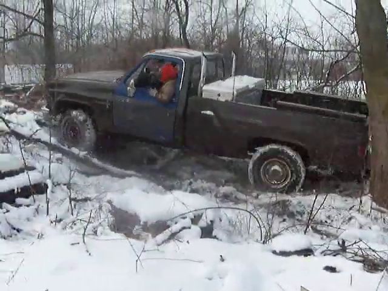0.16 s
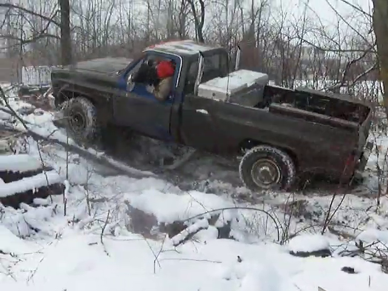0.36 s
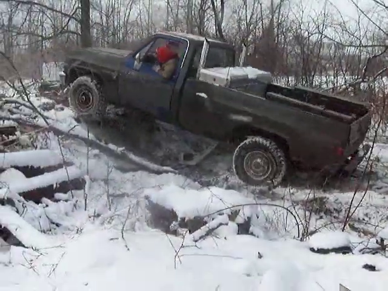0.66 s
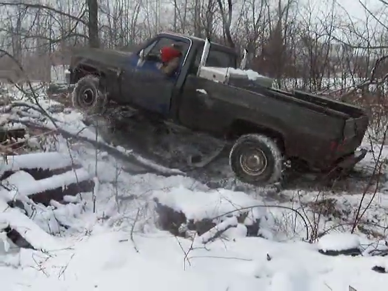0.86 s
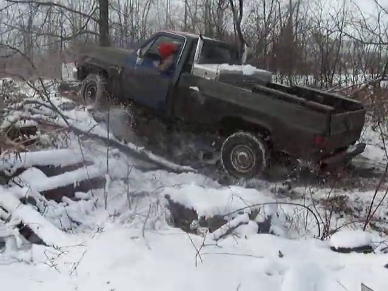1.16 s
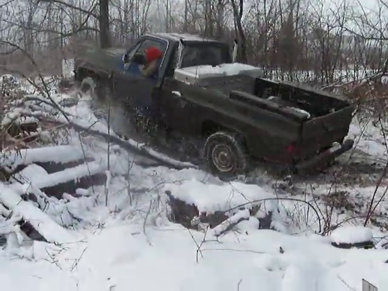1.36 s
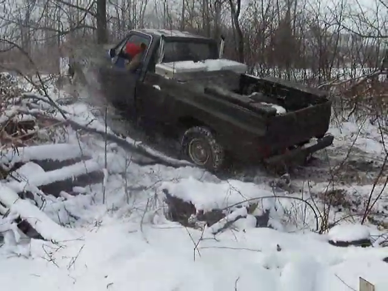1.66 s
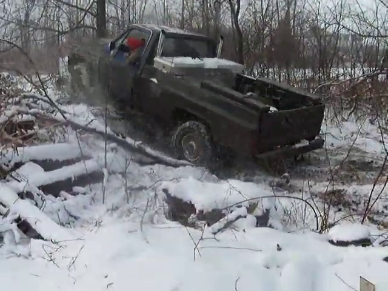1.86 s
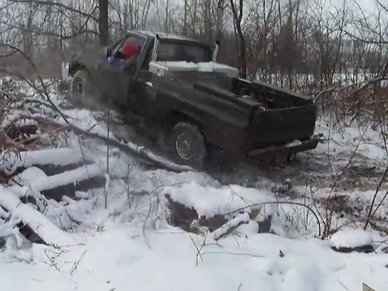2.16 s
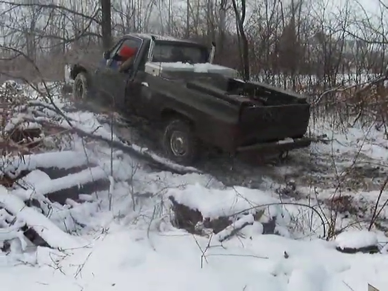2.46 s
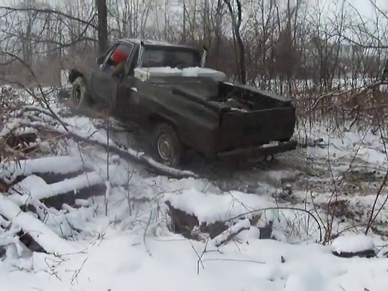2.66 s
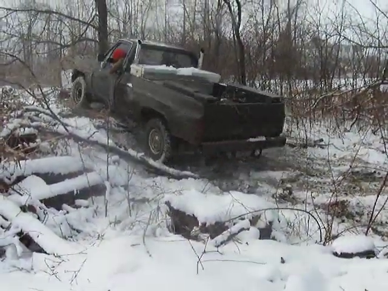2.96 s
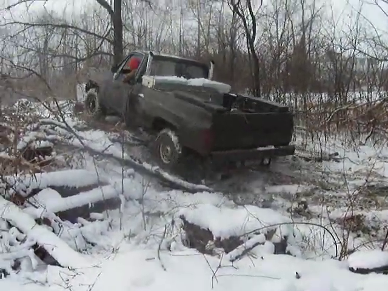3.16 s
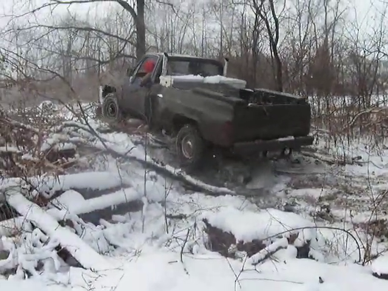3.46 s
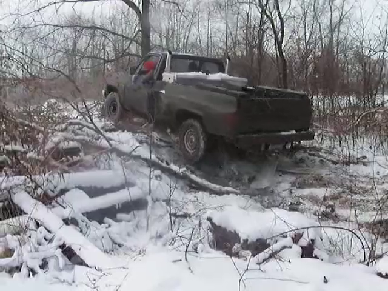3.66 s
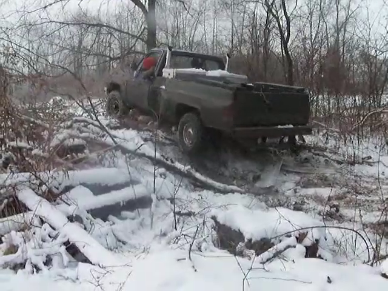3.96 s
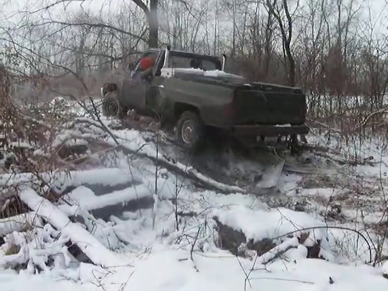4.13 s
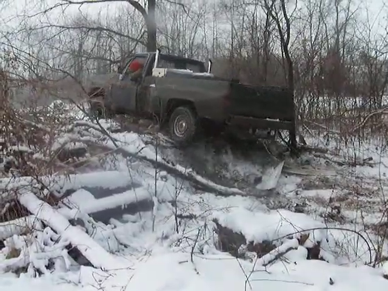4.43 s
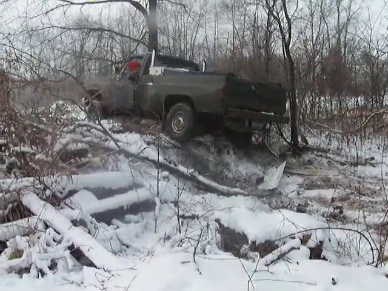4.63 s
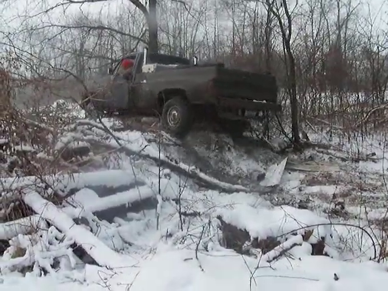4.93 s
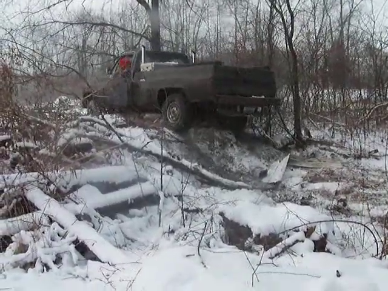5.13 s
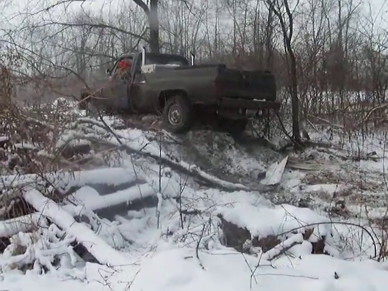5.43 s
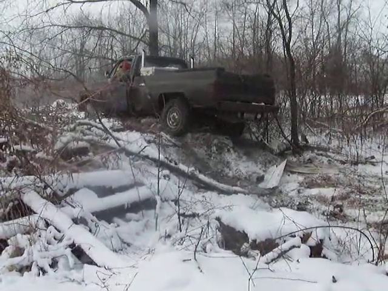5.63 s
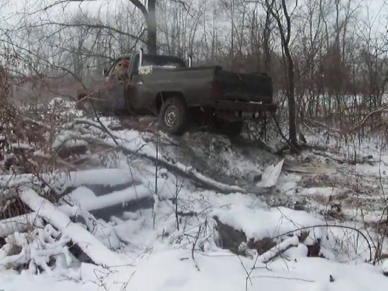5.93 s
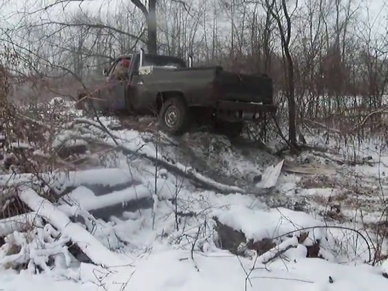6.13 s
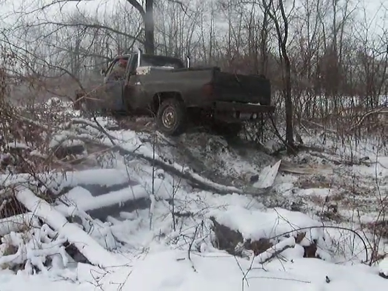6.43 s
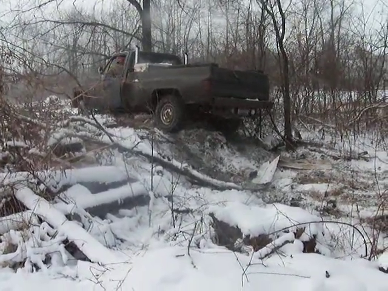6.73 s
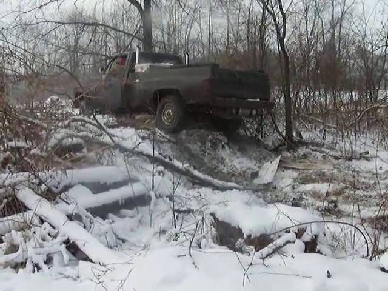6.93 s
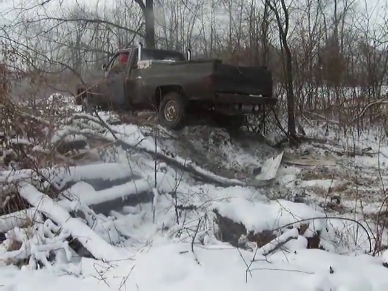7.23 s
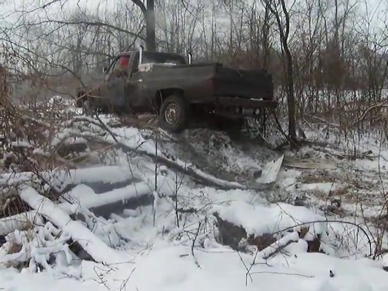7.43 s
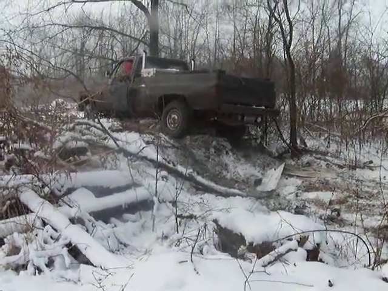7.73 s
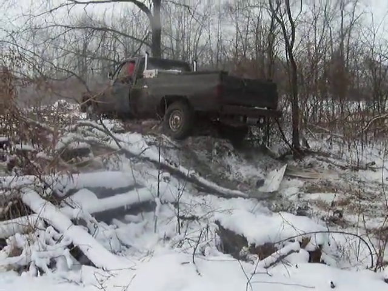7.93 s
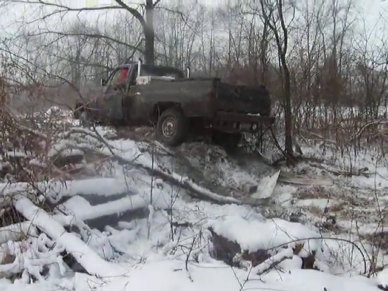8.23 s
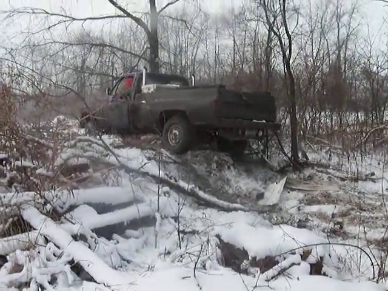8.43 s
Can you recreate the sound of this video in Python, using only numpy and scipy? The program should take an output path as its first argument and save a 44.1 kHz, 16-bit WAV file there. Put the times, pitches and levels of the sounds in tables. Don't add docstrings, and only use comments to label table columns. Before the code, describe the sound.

Outdoors in snowy woods, an old pickup's eight-cylinder engine roars at high revs some metres away, exhaust raspy, hissing and spitting, sagging as the tyres bite. The body crashes on the bank, the throttle drops, blips once and falls to a lumpy idle. After a quick stab of gas and a dry twig snap, it revs up hard again. Wind buffets and thumps the small stereo microphone.

```python
import sys
import numpy as np
from scipy import signal
from scipy.fft import rfft, irfft, next_fast_len
from scipy.io import wavfile
from scipy.ndimage import map_coordinates

SR = 44100
rng = np.random.default_rng(int(sys.argv[2]) if len(sys.argv) > 2 else 0)


def generate_wav(signal):
    frames = np.transpose(np.atleast_2d(signal))
    scaled = np.clip(frames, -1, 1) * 32767
    pcm = np.round(scaled).astype(np.int16)
    wavfile.write(sys.argv[1], SR, pcm)


def natural_amplitude(level_db):
    exponent = np.asarray(level_db, float) / 20
    return 10 ** exponent


N = 378819

# time in seconds, engine cycles in Hz.
ENGINE_SPEED = [(0.0, 24.37), (0.35, 25.0), (0.61, 26.93), (1.03, 28.43), (2.47, 29.61), (3.86, 28.34),
                (4.3, 27.15), (4.72, 19.22), (5.01, 20.41), (5.36, 25.82), (5.75, 19.86), (6.43, 16.74),
                (7.1, 15.05), (7.44, 17.05), (7.7, 15.87), (8.01, 19.77), (8.2, 21.24), (8.59, 27.98)]
# time in seconds, drop in Hz, half width in seconds.
SPEED_DIPS = [
    (1.57, 1.95, 0.33),
    (3.29, 1.37, 0.33),
    (2.5, 0.7, 0.14),
    (7.8, 0.6, 0.1),
]
# time in seconds, blast level in
# dB.
THROTTLE = [(0, -24), (1.4, -22), (2.9, -25.5), (4.22, -26), (4.45, -32.5), (4.65, -24.5), (4.9, -33),
            (5.31, -26), (5.86, -40.5), (7.11, -42), (7.35, -27.5), (7.735, -40), (7.79, -27.5),
            (7.94, -27), (8.02, -35.5), (8.35, -21), (8.52, -24), (8.59, -30)]
# time in seconds, pipe at full throttle in dB, boom in dB,
# far bank in dB, far bank delay in ms.
TAIL_ASPECT = [(.17, -9.5, -17.5, -3, 1.2), (.5, -10.5, -25.5, -5, .6), (1.0, -10, -19.5, -4, 0.44),
               (1.5, -11.5, -14.5, -3, 1.72), (1.9, -10.5, -19.5, -5.5, 0.84), (2.3, -10, -17, 2, 1.14),
               (3.0, -13, -16.5, 1.5, 0.91), (3.7, -15, -13.5, 4, 0.74), (4.2, -15, -19.5, 0.5, 0.64),
               (4.9, -23.5, -4.5, 9, 0.92), (5.2, -15, -14.5, 1.5, 0.93), (5.55, -11.5, -6.5, -3, 1.1),
               (6.5, -14.5, -9, -1.5, .3), (7.2, -15.5, -7.5, 4.5, 0.64), (7.5, -12, -10.5, 0, 0.11),
               (8.05, -16.5, -4.5, 7.5, 1.1), (8.3, -14, -10, 3.5, 0.89), (8.45, -13.5, -13.5, -0.5, .7)]
# place in eighths of the cycle, header delay in ms and
# size in dB when racing, delay in ms and size in dB when loping.
NEAR_BANK = [(0, .1, 5.4, -.5, 4.4), (2, -1.1, .2, -4.8, -12.5), (3, -1.6, -2.1, -.8, 1.6),
             (5, .1, -4.7, -.3, -3.9)]
FAR_BANK = [(1, 2.5, -10, 3.4, -4.9), (4, 1.2, -1.8, 1.6, -2.9), (6, -.9, 3.5, -.3, 0),
            (7, -1.9, -18.9, 0, -10.3)]
# Misfires, in seconds.
MISFIRES = [
    4.9,
    6.4,
]
# centre in Hz, width in Hz, level in dB.
BARK_MODES = [(286.3, 198.5, -9.5), (322.1, 164.5, 3.8), (327.5, 157.4, 1.9)]
BOOM_MODES = [(33.3, 26, -.3), (62.8, 26, .6), (133.7, 22.6, -10.8)]
UPPER_MODES = [(376.6, 82, -7), (135.9, 22.6, 6.6), (632, 360, -20)]
RASP_MODES = [(505, 169, 7.5), (625, 260, 7), (798, 87, 9), (1027, 150, -3.5)]
# frequency in Hz, level in dB per Hz.
HISS_COLOUR = [(590, -4), (1000, -8.5), (1180, -12), (1800, -10), (2080, -14.5), (2310, -10.5), (2510, -11),
               (4440, -11.5), (4900, -9.5), (5700, -0.5), (6240, -9), (6880, -7.5), (8450, -38),
               (11000, -54), (18600, -120)]
# time in seconds, peak in dB.
COUGHS = [(2.62, -20), (2.75, -19), (2.88, -17), (7.758, -21.5), (7.778, -19.5), (7.82, -14.5),
          (7.878, -11), (7.935, -13.5), (7.988, -16)]
# time in seconds, peak in dB.
SPITS = [(1.306, -9.5), (1.3943, -2), (1.5238, -5.5), (1.609, -10), (1.8618, -11.5), (2.071, -12),
         (2.164, -10), (2.375, -11.5), (1.933, -10), (2.458, -9), (2.515, -14), (2.598, -12), (2.621, -16),
         (2.656, -17), (2.724, -12.5), (3.325, -16.5), (3.68, -8), (4.055, -13), (3.756, -10),
         (4.1852, -14), (4.317, -10.5), (4.906, -17.5), (5.1269, -13.5), (5.257, -15), (5.383, -18),
         (5.617, -18.5), (6.2667, -28), (7.205, -16.5), (7.226, -17.5), (7.2672, -13.5), (7.33, -11.5),
         (7.819, -6), (7.84, -15), (7.8774, -6.5), (7.899, -16.5), (7.934, -11), (7.9858, -13.5),
         (8.179, -14), (8.3612, -8), (8.4846, -6.5)]
# time in seconds, peak in dB, t60 in seconds, dullness in dB.
BODY_BANGS = [(4.2722, -20.5, 0.093, 7), (4.402, -13.5, 0.24, -5.5), (4.4608, -13, 0.2, 8),
              (4.469, -10.5, 0.079, -0.5), (4.4803, -13.5, 0.3, 6), (4.499, -17.5, 0.13, -5.5),
              (4.4967, 1.5, 0.062, -11.5), (4.591, -23.5, 0.32, -5), (4.6313, -26, 0.2, 14),
              (4.6508, -24.5, 0.13, 4.5), (4.68, -17.5, 0.27, 0)]
# centre in Hz, width in Hz, level in dB.
PANEL_MODES = [(410, 120, 0), (544, 66, 6.5), (970, 220, -1.5), (1564, 220, -4), (1930, 170, -3.5),
               (2140, 220, -7), (2680, 200, -1), (3250, 210, -5), (3970, 110, -4.5), (5500, 270, -1.5)]
# time in seconds, peak in dB, t60 in seconds.
TWIGS = [
    (7.6008, -22.5, .012),
    (7.6252, -8.5, 0.0089),
]
# frequency in Hz, level in dB per Hz.
SNAP_COLOUR = [(1500, -27), (4500, -14.5), (5700, 3), (7000, -15), (9000, -22), (11500, -10), (15500, -20),
               (19000, -60)]
# time in seconds, peak in dB, half width in seconds.
GUSTS = [(.4, -22, 0.1), (1.8, -23, 0.33), (2.2, -26.5, 0.13), (2.578, -32.5, 0.065), (3.15, -29.5, 0.049),
         (3.38, -30, 0.19), (3.75, -27.5, 0.47), (4.3, -22.5, 0.33), (4.58, -20, 0.042), (4.83, -18, 0.16),
         (5.15, -14.5, 0.18), (5.619, -25.5, 0.15), (5.9, -18.5, 0.13), (6.25, -27, 0.067),
         (6.55, -23.5, 0.066), (6.88, -27.5, 0.043), (7.35, -19, 0.14), (7.65, -13.5, 0.14),
         (8.001, -22.5, 0.057), (8.301, -19.5, 0.099)]
# time in seconds, peak in dB.
THUMPS = [(3.289, -5.5), (3.936, 3.5), (4.848, 1), (4.949, 2), (5.811, -9.5), (5.921, -4), (5.935, -9),
          (5.987, -11), (6.156, -11), (6.205, -6.5), (6.247, -10), (6.431, -15.5), (6.551, -19.5)]
# frequency in Hz, level in dB per Hz.
BUFFET_COLOUR = [(12, -11), (25, 1), (40, -8.5), (60, -2), (130, -14.5), (250, -31.5), (500, -78)]
FLAP_COLOUR = [(80, -8), (150, 6), (300, 2.5), (700, -20.5), (1500, -36.5), (4000, -57.5)]
# time in seconds, left over right in dB.
WINDWARD = [(0, 0.5), (2.8, 5.5), (3.2, 14), (4.3, 8), (4.5, 6.5), (5.4, 3.5), (5.8, 7), (6.2, 12.5),
            (6.8, 2.5), (7.2, -12), (8.59, 2)]
# frequency in Hz, left-right likeness from 0 to 1.
LIKENESS = [(60, 0.71), (110, 0.84), (200, 0.71), (380, 0.93), (690, 1), (1280, 1), (2350, 0.94), (4340, 1),
            (8000, 0.52)]
# frequency in Hz, left over right in dB.
TRUCK_LEAN = [(60, 2), (98, 2.5), (160, 1), (260, 1), (420, -1.5), (690, 2), (1130, 5.5), (1840, 6),
              (3010, 0.5), (4900, 11), (8000, -6)]
# frequency in Hz, lead of the left port in radians.
TRUCK_LEAD = [(0, -1.6), (1120, 0.59), (1720, 0.6), (2410, -0.53), (2930, -0.88), (3700, 0.69),
              (4480, 0.87), (4740, 0.63), (5340, -1.5), (6120, -1.28), (6720, -0.47), (7060, -2), (7840, 1),
              (8180, 0.0)]

RACING_HZ, LOPING_HZ = 27, 16
FULL_DB = -23
PIPE_GROWS, RASP_GROWS = 0.65, 1.09
RASP_DB, UPPER_DB = -29, -29
MISS_DB, MISS_S = -11.5, 0.02
SPIT_T60_S, SPIT_DB, SPIT_LENGTHENS = 0.039, -9, 0.48
COUGH_T60_S, THUMP_T60_S = 0.075, 0.04
CALM_DB, FLAP_DB, FLAP_GROWS = -33, -5, 0.58


def engine():
    speed = curves(ENGINE_SPEED)[0] - sum(drop * bump(s, width) for s, drop, width in SPEED_DIPS)
    hiss_db, = curves(THROTTLE)
    pipe_db, boom_db, far_db, far_ms = curves(TAIL_ASPECT)
    below_full_db = hiss_db - FULL_DB
    pipe_db = pipe_db + PIPE_GROWS * below_full_db
    pipe_db = pipe_db + MISS_DB * sum(bump(s, MISS_S) for s in MISFIRES)
    rasp_db = RASP_DB + RASP_GROWS * below_full_db

    cycles = np.cumsum(speed) / SR - .15
    lope = np.clip((RACING_HZ - speed) / (RACING_HZ - LOPING_HZ), 0, 1)
    near = firings(cycles, lope, NEAR_BANK, scatter_db=.5, jitter_ms=.04)
    far = firings(cycles - speed * far_ms / 1000, lope, FAR_BANK, scatter_db=.5, jitter_ms=.04)
    pulses = (near + natural_amplitude(far_db) * far) * SR / (2 * speed)

    rounded = filtered(pulses, lambda hz: 1 / (1 + (hz / 450) ** 6))
    bark = filtered(rounded, pipe(BARK_MODES))
    boom = filtered(rounded, pipe(BOOM_MODES))
    upper = filtered(rounded, pipe(UPPER_MODES))
    tone = natural_amplitude(pipe_db + 8.5) * (natural_amplitude(boom_db) * boom - bark + natural_amplitude(UPPER_DB) * upper)

    puffs = unit(filtered(pulses * natural_amplitude(2.3 * wobble(40)), lambda hz: 1 / (1 + 1j * hz / 60) ** 2))
    rough = unit((0.68 + puffs) * rng.standard_normal(N))
    lines = 2.2 * unit(pulses) * np.clip(speed / 28, 0, 1) ** 2
    rasp = unit(filtered(lines + rough, pipe(RASP_MODES)))
    rasp = filtered(rasp, lambda hz: 1 / (1 + (hz / 1300) ** 6))

    gate = (0.93 + puffs) * natural_amplitude(0.67 * wobble(15))
    hiss = filtered(gate * rng.standard_normal((2, N)), lambda hz: natural_amplitude(along(HISS_COLOUR, hz)))
    hiss = spread(unit(hiss))
    return tone + natural_amplitude(rasp_db + 1.0) * rasp + natural_amplitude(hiss_db + 2.0) * hiss


def firings(cycles, lope, bank, scatter_db, jitter_ms):
    train = np.zeros(N)
    turn = np.arange(-1, int(cycles[-1]) + 1)
    for eighth, fast_ms, fast_db, slow_ms, slow_db in bank:
        chance = rng.standard_normal((300, 2))[:len(turn)]
        at = np.interp(turn + eighth / 8, cycles, np.arange(N), -N, 2 * N)
        slow = np.interp(at, np.arange(N), lope)
        delay_ms = fast_ms + slow * (slow_ms - fast_ms)
        size_db = fast_db + slow * (slow_db - fast_db)
        at = np.round(at + (delay_ms + jitter_ms * chance[:, 0]) * SR / 1000).astype(int)
        inside = (at >= 0) & (at < N)
        train[at[inside]] += natural_amplitude(size_db + scatter_db * chance[:, 1])[inside]
    return train


def coughs():
    rows = [(s, db, COUGH_T60_S) for s, db in COUGHS]
    return natural_amplitude(7.5) * filtered(bursts(rows, 0.003)[0], pipe(RASP_MODES[2:]))


def spits():
    rows = [(s, db, SPIT_T60_S * natural_amplitude(SPIT_LENGTHENS * (SPIT_DB - db))) for s, db in SPITS]
    bright = lambda hz: natural_amplitude(along(HISS_COLOUR, hz)) * (hz / 5500) ** 0.65
    return natural_amplitude(10.5) * spread(filtered(bursts(rows, 0.00095), bright))


def bangs():
    bright = bursts([row[:3] for row in BODY_BANGS], 0.00066)[0]
    dull = bursts([(s, db + dull_db, t60) for s, db, t60, dull_db in BODY_BANGS], 0.0042)[0]
    crash = filtered(bright, pipe(PANEL_MODES[3:])) + filtered(dull, pipe(PANEL_MODES[:3]))
    return natural_amplitude(8.5) * filtered(crash, lambda hz: 1 / (1 + (hz / 7500) ** 16))


def twigs():
    return natural_amplitude(17) * spread(filtered(bursts(TWIGS, 0.00046), lambda hz: natural_amplitude(along(SNAP_COLOUR, hz))))


def wind():
    strength = natural_amplitude(CALM_DB) + sum(natural_amplitude(db) * bump(s, width) for s, db, width in GUSTS)
    windward_db, = curves(WINDWARD)
    flap_colour = lambda hz: natural_amplitude(along(FLAP_COLOUR, hz))
    buffet = unit(filtered(lumps(4.7, 18), lambda hz: natural_amplitude(along(BUFFET_COLOUR, hz))))
    flap = unit(filtered(lumps(3.8, 55), flap_colour))
    flap_strength = natural_amplitude(CALM_DB + FLAP_DB) * (strength / natural_amplitude(CALM_DB)) ** FLAP_GROWS
    gusts = strength * buffet + flap_strength * flap
    gusts = gusts + 0.36 * gusts[::-1]
    thumps = bursts([(s, db, THUMP_T60_S) for s, db in THUMPS], 0.0025)
    thumps = natural_amplitude(12.0) * filtered(thumps, flap_colour)
    return (gusts + thumps) * natural_amplitude([windward_db, 0 * windward_db])


def lumps(depth_db, rate):
    swell_db = depth_db * np.array([wobble(rate), wobble(rate)])
    return natural_amplitude(swell_db) * rng.standard_normal((2, N))


def bursts(rows, attack):
    out = np.zeros((2, N + SR))
    t = np.arange(SR // 4) / SR
    for s, db, t60 in rows:
        shape = natural_amplitude(db - 60 * t / max(t60, .005)) * (1 - np.exp(-t / attack))
        out[:, round(s * SR):][:, :len(t)] += shape * rng.standard_normal((2, len(t)))
    return out[:, :N]


def pipe(modes):
    def response(f):
        total = 0
        for k, (centre, width, db) in enumerate(modes):
            damping = 1j * f * width
            total = total + (-1) ** k * natural_amplitude(db) * damping / (centre * centre - f * f + damping)
        return total
    return response


def spread(pair):
    turn = lambda hz: np.arccos(np.clip(along(LIKENESS, hz), -1, 1)) / 2
    mid, side = filtered(pair, lambda hz: np.array([np.cos(turn(hz)), np.sin(turn(hz))]))
    return np.array([mid + side, mid - side])


def filtered(x, response):
    m = next_fast_len(N + SR // 2)
    return irfft(rfft(x, m) * response(np.fft.rfftfreq(m, 1 / SR)), m)[..., :N]


def along(points, hz):
    f, v = np.transpose(points)
    return np.interp(np.log(hz + 1), np.log(f + 1), v)


def curves(rows):
    s, *cols = np.transpose(rows)
    return [np.interp(np.arange(N) / SR, s, c) for c in cols]


def bump(s, width):
    return np.exp(-((np.arange(N) / SR - s) / width) ** 2)


def wobble(rate):
    return map_coordinates(rng.standard_normal(1000), [np.arange(N) * rate / SR])


def unit(x):
    return x / np.sqrt(np.mean(x ** 2) + 1e-20)


def scene():
    truck = engine() + spits() + coughs() + bangs() + twigs()
    half = np.array([[.5], [-.5]])
    level = lambda hz: natural_amplitude(half * along(TRUCK_LEAN, hz))
    phase = lambda hz: np.exp(1j * half * along(TRUCK_LEAD, hz))
    return filtered(truck, lambda hz: level(hz) * phase(hz)) + wind()


def low_pass(x):
    return signal.sosfilt(signal.butter(12, 8600, fs=SR, output="sos"), x)


def record(dry):
    rolled_off = filtered(dry, lambda hz: hz ** 2 / (hz ** 2 + 9 ** 2))
    return low_pass(np.clip(rolled_off, -1, 1))


dry = scene()
out = record(dry)
generate_wav(out)
```